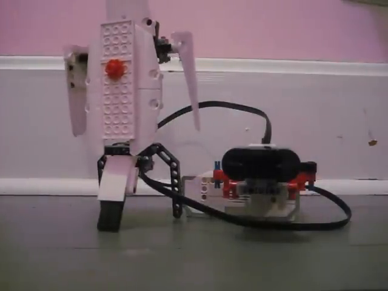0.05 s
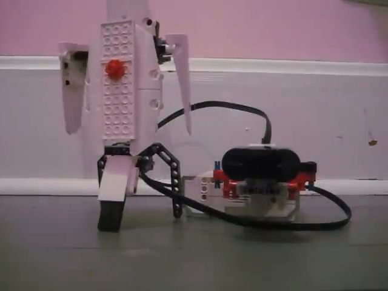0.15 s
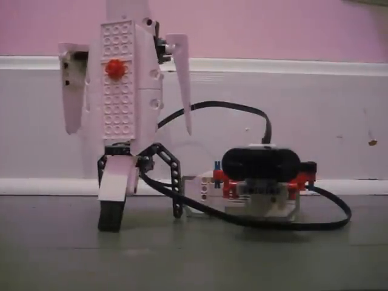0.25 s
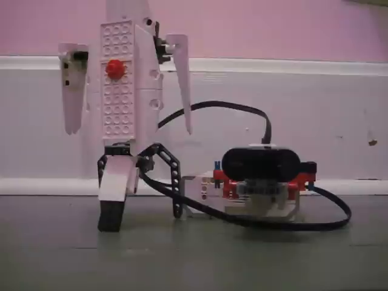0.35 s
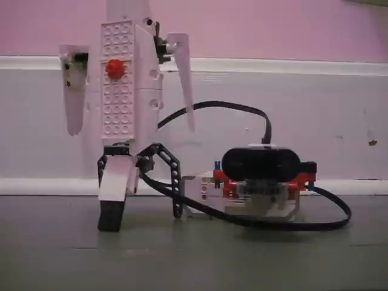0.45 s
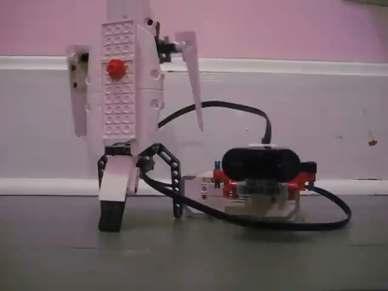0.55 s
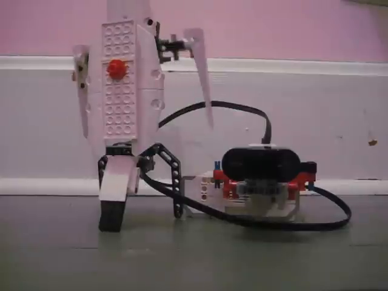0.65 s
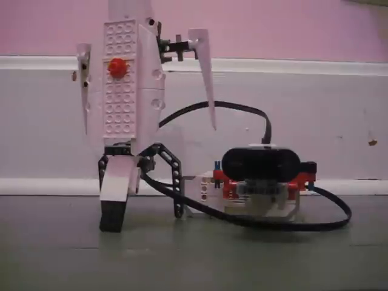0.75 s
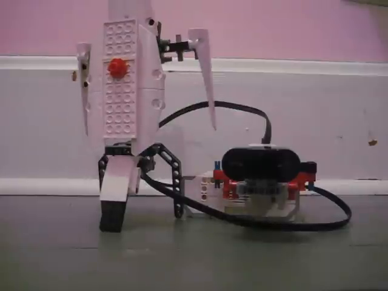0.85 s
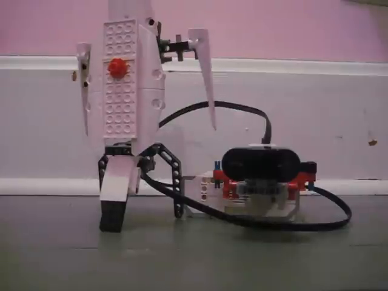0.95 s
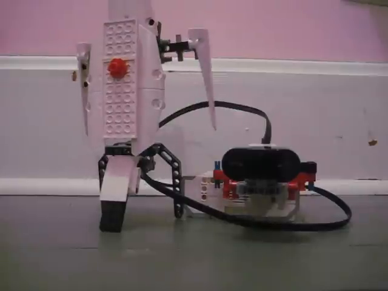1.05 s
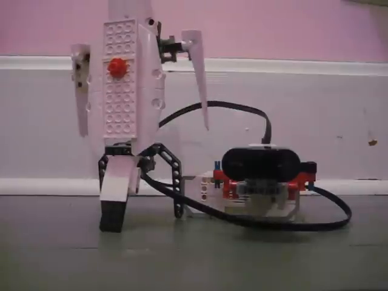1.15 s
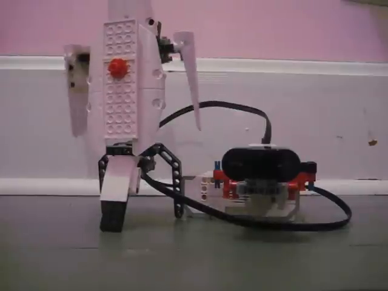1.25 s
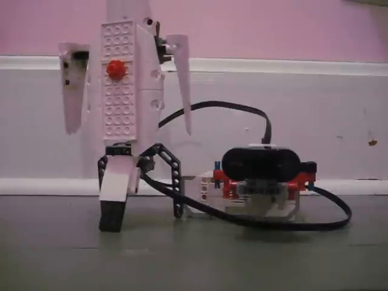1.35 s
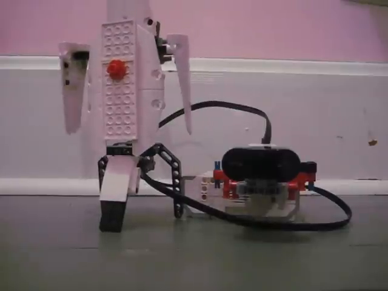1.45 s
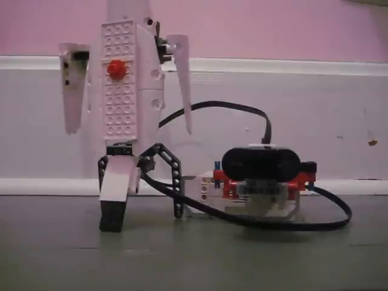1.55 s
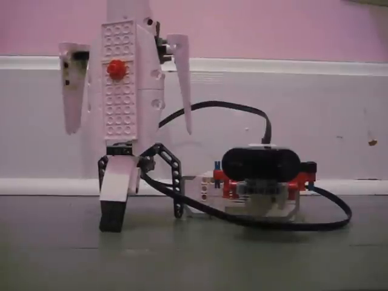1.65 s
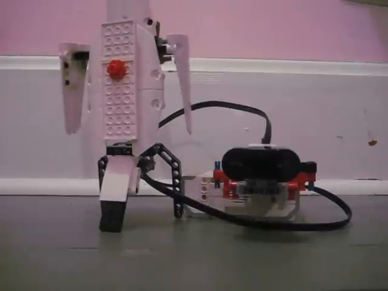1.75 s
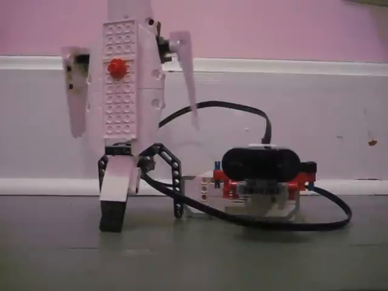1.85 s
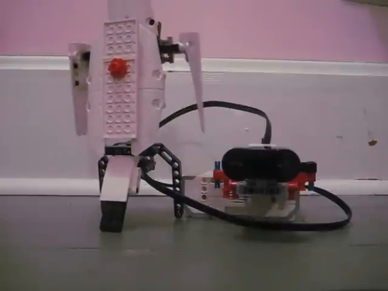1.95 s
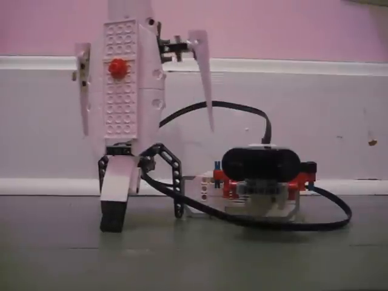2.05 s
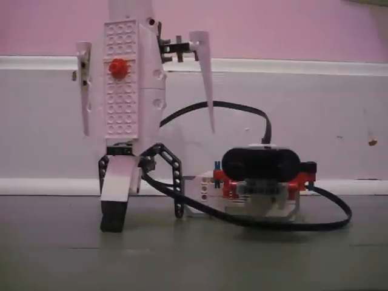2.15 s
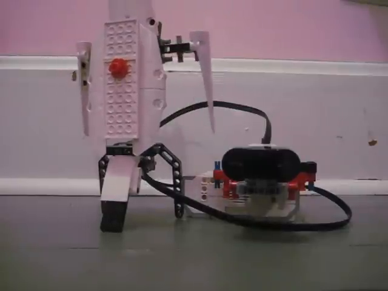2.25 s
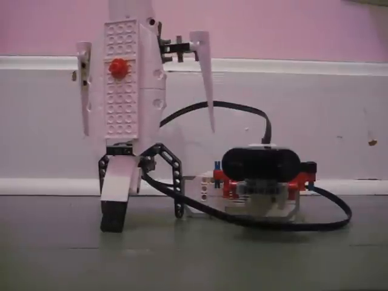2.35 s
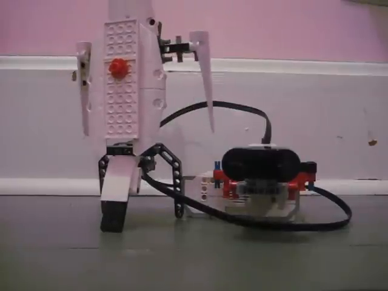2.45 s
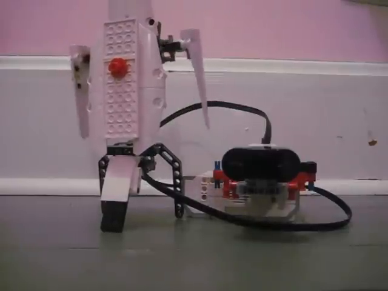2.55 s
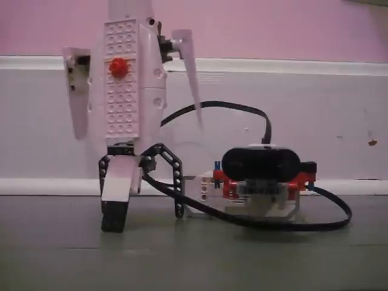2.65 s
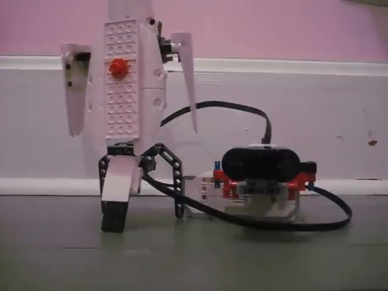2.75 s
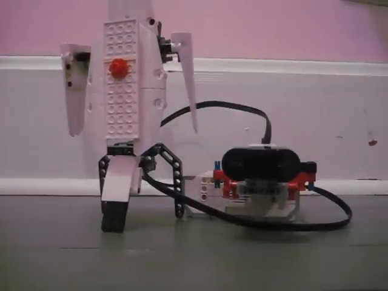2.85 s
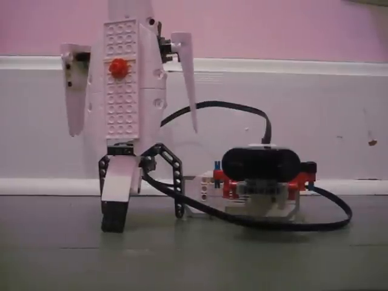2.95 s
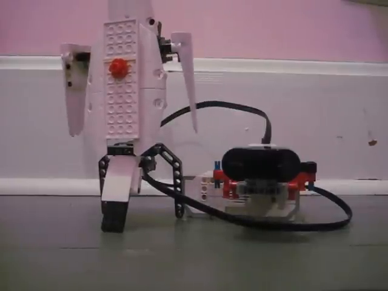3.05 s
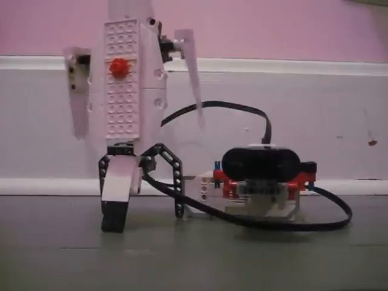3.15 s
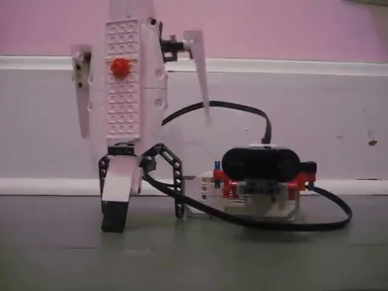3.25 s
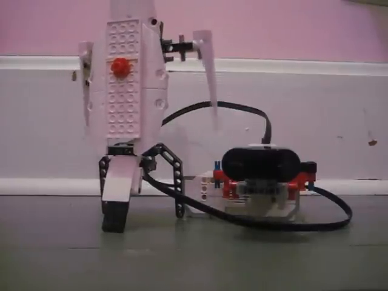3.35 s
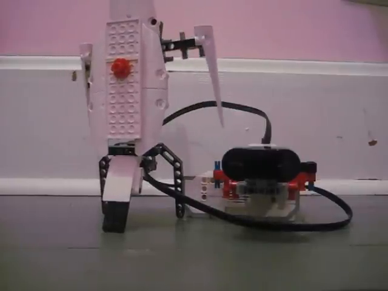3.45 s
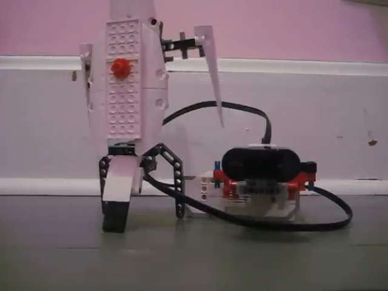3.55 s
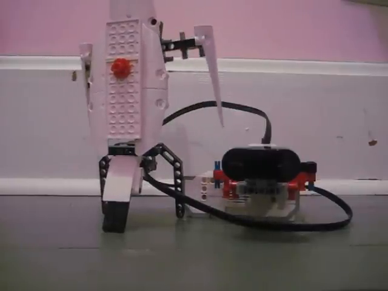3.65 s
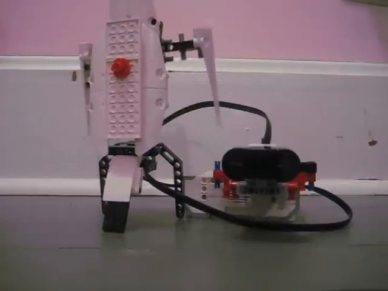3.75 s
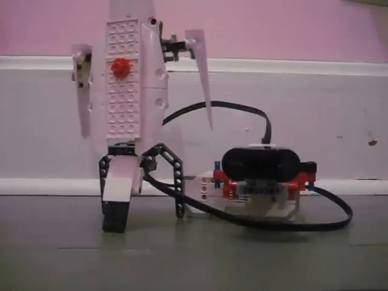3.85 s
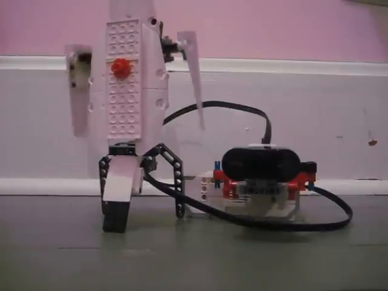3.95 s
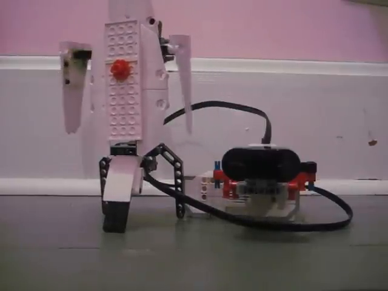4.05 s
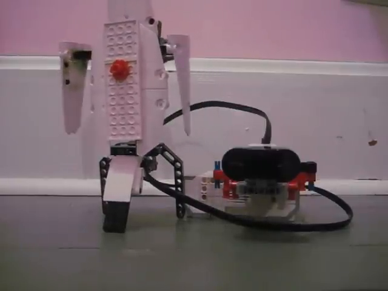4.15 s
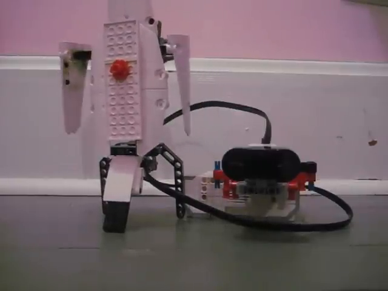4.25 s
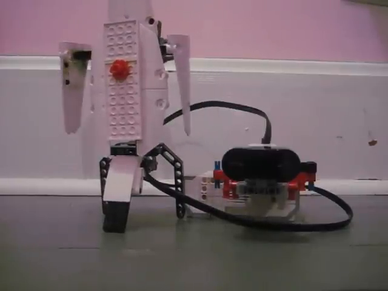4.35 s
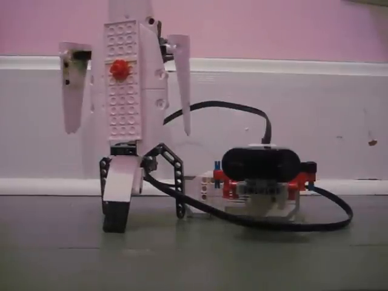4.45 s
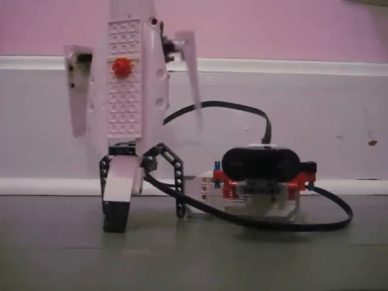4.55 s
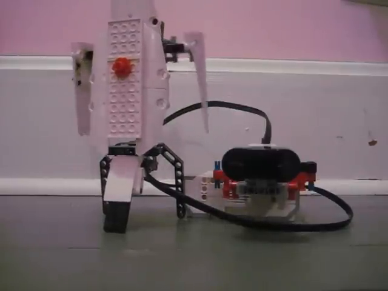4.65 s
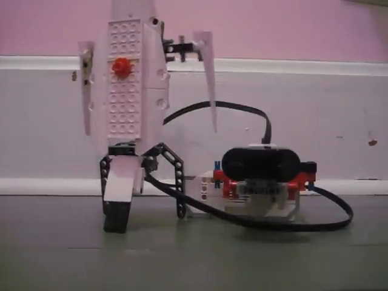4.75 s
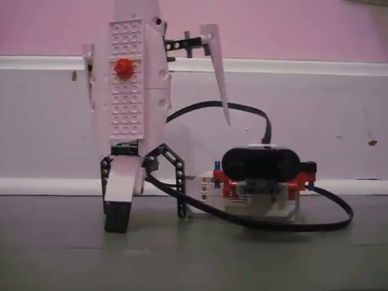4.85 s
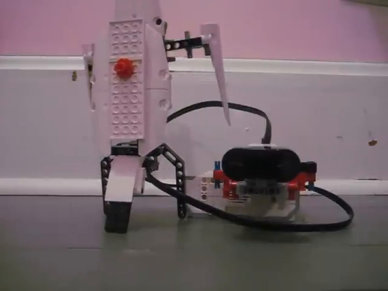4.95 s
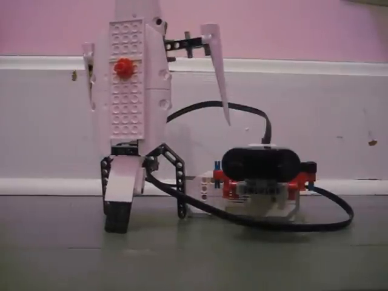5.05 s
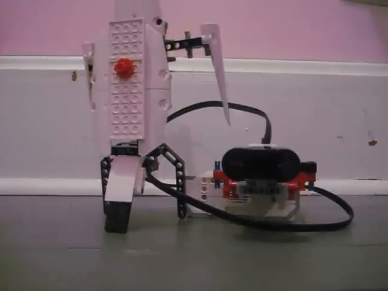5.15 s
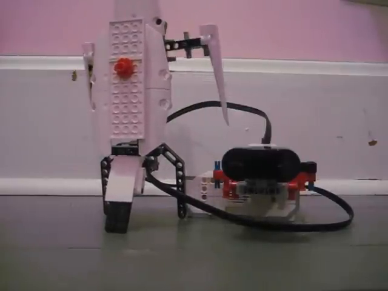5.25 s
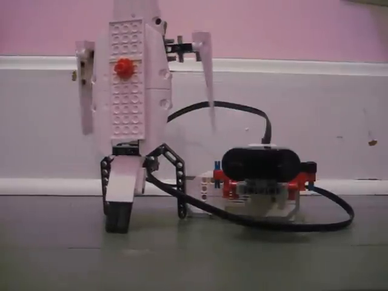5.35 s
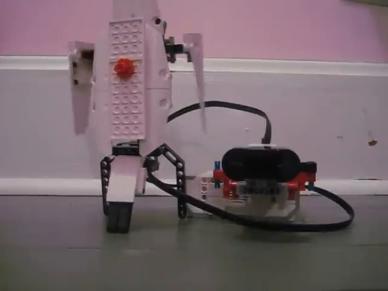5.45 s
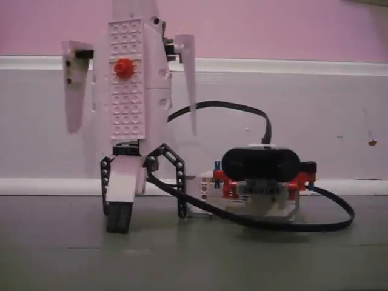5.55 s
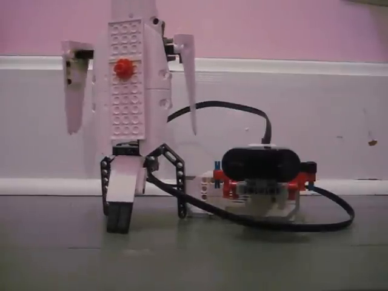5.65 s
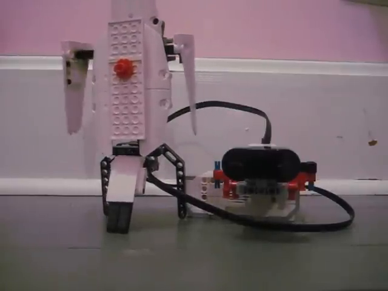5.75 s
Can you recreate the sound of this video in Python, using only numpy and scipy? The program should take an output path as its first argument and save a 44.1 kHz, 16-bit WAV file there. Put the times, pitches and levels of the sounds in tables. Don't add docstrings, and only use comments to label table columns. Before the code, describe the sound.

A small geared toy motor is heard close up on a hard floor in a bare room. It is already rasping at the start and stops at 0.14 s. Eight more bursts start at about 0.44, 1.06, 1.8, 2.45, 3.1, 3.75, 4.5 and 5.25 s, each lasting 0.25 to 0.35 s. Each spins up almost instantly into dense, bright plastic chatter, sagging briefly as the gears bind, then cuts off with a short room ring; bursts seven and eight coast down more slowly. Forward swings squeal higher, around 2 kHz, with a singing motor tone; back swings squeal lower, near 1.5 kHz. Feet thud softly and skid, notably at 3.4 and 5.6 s. A hard plastic knock lands at 1.34 s, with sharp ticks at 1.2, 2.55 and 4.7 s. Weaker knocks at 5.57 s lead to faint low creaks until 5.8 s. Hiss, rumble and thin electronic whistles continue throughout.

```python
import sys
import numpy as np
from scipy import signal
from scipy.fft import rfft, irfft
from scipy.io import wavfile
from scipy.ndimage import uniform_filter1d

SR = 44100
rng = np.random.default_rng(int(sys.argv[2]) if len(sys.argv) > 2 else 0)


def convert_level_to_amplitude(level_db):
    exponent = np.asarray(level_db, float) / 20
    return 10 ** exponent


def put_to_file(sound):
    columns = np.atleast_2d(sound).T
    safe = np.clip(columns, -1, 1)
    whole_steps = np.round(safe * 32767)
    wavfile.write(sys.argv[1], SR, whole_steps.astype(np.int16))


N = 255780
TIME = np.arange(N) / SR
BINS = np.maximum(np.fft.rfftfreq(N, 1 / SR), 1)


def rms_one(x):
    return x / np.sqrt(np.mean(x ** 2) + 1e-20)


def at_hz(points, hz):
    points_hz, values = np.array(points).T
    return np.interp(np.log(hz), np.log(points_hz), values)


def colour(x, gain):
    return irfft(rfft(x) * gain, N)


def low_pass(hz, order):
    return 1 / np.sqrt(1 + (BINS / hz) ** order)


def drift(rate_hz):
    return rms_one(colour(rng.standard_normal(N), 1 / (1 + (BINS / rate_hz) ** 2)))


def resonate(x, hz, width_hz):
    r = np.exp(-np.pi * width_hz / SR)
    zeros = [(1 - r * r) / 2, 0, (r * r - 1) / 2]
    poles = [1, -2 * r * np.cos(2 * np.pi * hz / SR), r * r]
    return signal.lfilter(zeros, poles, x + 1e-18)


def strikes(rows):
    out = np.zeros(N)
    for s, db in rows:
        out[round(s * SR)] = convert_level_to_amplitude(db)
    return out


def bell(centre_s, width_s):
    return np.exp(-.5 * ((TIME - centre_s) / width_s) ** 2)


def swells(rows):
    return sum(convert_level_to_amplitude(db) * bell(s, width_s) for s, db, width_s in rows)


def evened(x, seconds):
    return x / np.sqrt(uniform_filter1d(x ** 2, size=round(seconds * SR)) + 1e-20)


# start in seconds, stop in seconds, chatter level in dB,
# spin-up time in seconds, coasting rate in dB per second.
SWINGS = [
    (-0.06, 0.136, -20.5, 0.022, 520),
    (0.441, 0.706, -23, 0.011, 600),
    (1.056, 1.336, -20.5, 0.017, 478),
    (1.815, 2.077, -22, 0.015, 700),
    (2.442, 2.677, -20.5, 0.013, 520),
    (3.097, 3.389, -21.5, 0.022, 598),
    (3.733, 4.045, -20.5, 0.012, 314),
    (4.491, 4.831, -22, 0.011, 330),
    (5.238, 5.561, -20, 0.011, 420),
]


def running(column_db, coast_share=1, linger_s=0., spin_shares=(1, 1)):
    kick_db, kick_s, spin_up_db = 21, 0.0032, 20.5
    out = np.full(N, -200.)
    for k, ((start, stop, _, spin_s, coast), db) in enumerate(zip(SWINGS, column_db)):
        t = np.maximum(TIME - start, 0)
        kick = kick_db * np.exp(-t / kick_s)
        spin_up = spin_shares[k % 2] * spin_up_db * np.exp(-t / spin_s)
        backswing = k % 2 == 0
        fall = coast_share * coast * np.maximum(TIME - stop - linger_s * backswing, 0)
        out = np.where(TIME >= start, db - kick - spin_up - fall, out)
    return out


# time in seconds, depth in dB.
HITCHES = [(0.031, 3.5), (0.575, 2), (0.66, 2), (1.14, 2.5), (1.225, 0.5), (1.953, 3.5), (2.039, 4.5),
           (2.512, 4.5), (2.605, 0), (3.225, 2.5), (3.3, 3.5), (3.825, 1.5), (3.92, -2), (4.575, -0.5),
           (4.64, 3.5), (4.725, 3), (5.345, 0), (5.43, 0), (5.49, 0.5)]


def gear_levels():
    sag_s, free_s = 0.018, 0.007
    brake_db, brake_s = 1, 0.0098
    chatter = np.array(SWINGS)[:, 2]
    low = chatter + np.resize((-6.5, -4.5), len(SWINGS))
    edge = chatter + np.resize((-6.5, -4.5), len(SWINGS))
    sag = 0
    for s, depth_db in HITCHES:
        sag = sag + depth_db * np.exp(np.where(TIME < s, (TIME - s) / sag_s, (s - TIME) / free_s))
    flare = sum(brake_db * bell(stop - brake_s, brake_s) for _, stop, *_ in SWINGS[1::2])
    chatter_db = running(chatter)
    edge_db = running(edge, coast_share=1.6, spin_shares=(1.5, 1.5)) - chatter_db - 0.9 * sag + flare
    low_db = running(low, coast_share=0.83, linger_s=0.0071, spin_shares=(0.13, 1.2)) - sag
    return chatter_db - sag, low_db, edge_db


# frequency in Hz, level in dB per Hz.
HOUSING = [(410, -44), (700, -9.5), (1360, -5), (1540, -0.5), (2190, -6.5), (2460, -7), (2870, -5.5),
           (3110, -5), (3580, 1), (4470, -4.5), (5710, 3.5), (8880, -12), (9720, -15.5), (15500, -16)]
# frequency in Hz, width in Hz, level in dB.
SHELL = [(2250, 160, -1), (2886, 200, 7), (3557, 116, 0.5), (4870, 1200, 4.5), (7350, 190, -21)]


def gears(contacts_per_s, spread_db, lumpy_db, shell_db, panel_db):
    chatter_db, low_db, edge_db = gear_levels()
    sizes = convert_level_to_amplitude(spread_db * np.minimum(rng.exponential(1, N), 5)) * rng.choice([-1, 1], N)
    contacts = rms_one(sizes * (rng.random(N) < contacts_per_s / SR))
    panels_hz = np.geomspace(1000, 15000, 36) * rng.uniform(.98, 1.02, 36)
    panels = sum(convert_level_to_amplitude(panel_db + 4 * drift(35)) * resonate(contacts, hz, .035 * hz) for hz in panels_hz)
    shell = 0
    for hz, width_hz, db in SHELL:
        shell = shell + convert_level_to_amplitude(db + shell_db + 3 * drift(25)) * resonate(contacts, hz, width_hz)
    body = colour(contacts + panels, convert_level_to_amplitude(at_hz(HOUSING[:-1], BINS))) + shell
    above_low = 1 / np.sqrt(1 + (2500 / BINS) ** 8)
    above_middle = 1 / np.sqrt(1 + (8300 / BINS) ** 12)
    low = evened(colour(body, low_pass(2500, 8)), .05)
    middle = evened(colour(body, above_low * low_pass(8300, 12)), .05)
    edge = evened(colour(body, above_middle), .05)
    high = middle + convert_level_to_amplitude(edge_db) * edge
    return convert_level_to_amplitude(lumpy_db * drift(70)) * (convert_level_to_amplitude(chatter_db) * high + convert_level_to_amplitude(low_db - 0.5) * low)


# start in seconds, start in Hz, end in Hz, level in dB.
PINION = [(0.07, 2190, 2120, -32), (0.484, 2010, 2130, -20), (0.501, 2197, 2025, -12),
          (0.54, 1880, 1750, -20), (0.573, 2100, 2295, -20), (0.598, 2230, 2150, -21),
          (1.845, 2110, 2110, -22), (1.873, 2163, 2107, -12.5), (1.925, 1960, 1760, -20.5),
          (2.018, 2086, 1920, -25), (3.149, 2220, 1910, -15), (3.191, 1746, 1995, -18.5),
          (3.341, 2165, 2100, -16.5), (4.577, 2410, 1970, -15.5), (4.61, 1940, 1915, -15),
          (4.644, 2090, 2250, -19.5), (4.667, 2170, 2230, -23), (4.765, 2210, 2130, -16),
          (4.797, 2133, 2000, -23), (4.823, 2250, 2380, -20), (5.358, 2230, 2240, -20)]
# start in seconds, start in Hz, end in Hz, level in dB.
WHEEL = [(0.092, 1606, 1426, -20.5), (0.145, 1120, 1057, -29), (0.68, 1443, 1570, -22.5),
         (1.082, 1274, 1105, -27.5), (1.176, 1680, 1500, -25), (1.308, 1462, 1610, -22.5),
         (1.952, 1500, 1495, -23), (2.452, 1097, 1080, -28), (2.553, 1663, 1500, -19.5),
         (2.657, 1686, 1550, -34), (3.221, 1462, 1430, -26), (3.772, 1470, 1350, -24),
         (3.876, 1638, 1577, -23), (3.935, 1610, 1508, -40), (3.988, 1503, 1356, -27),
         (4.027, 1292, 1243, -23), (4.51, 1412, 1676, -23.5), (4.535, 1750, 1546, -19.5),
         (4.786, 1420, 1319, -20.5), (5.262, 1517, 1750, -28), (5.272, 740, 880, -27),
         (5.293, 1597, 1530, -21.5), (5.401, 1542, 1590, -21.5), (5.443, 1592, 1550, -40),
         (5.493, 1584, 1480, -25), (5.538, 1460, 1370, -24)]
# start in seconds, start in Hz, end in Hz, level in dB.
CREAKS = [
    (5.63, 449, 430, -39),
    (5.69, 430, 400, -49),
    (5.755, 420, 410, -44),
]


def whine(wobble):
    out = np.zeros(N)
    rough = 1 + wobble * drift(90)
    flutter = convert_level_to_amplitude(3 * drift(140))
    for squeals, length_s in (PINION, 0.0304), (WHEEL, 0.044), (CREAKS, 0.044):
        count = round(length_s * SR)
        for s, start_hz, end_hz, db in squeals:
            first = round(s * SR)
            span = slice(first, first + count)
            glide_hz = np.linspace(start_hz, end_hz, count) * rough[span]
            phase = 2 * np.pi * np.cumsum(glide_hz) / SR
            out[span] += convert_level_to_amplitude(db - 4.5) * np.sqrt(np.hanning(count)) * np.sin(phase)
    return out * flutter


# time in seconds, level in dB, width in seconds.
DRIVE = [(0.11, -42, 0.03), (0.51, -32.5, 0.03), (0.62, -36, 0.045), (1.273, -35, 0.04), (1.89, -30, 0.025),
         (2.03, -35, 0.046), (2.638, -38, 0.048), (3.17, -32, 0.035), (3.35, -32.5, 0.038),
         (3.993, -40, 0.05), (4.68, -28, 0.027), (4.79, -30.5, 0.03), (5.45, -46, 0.08)]
# multiple of the fundamental, level in dB.
DRIVE_ORDERS = [(2, -4.0), (3, -3.0), (4, -0.5), (5, -3.0), (7, -3.0), (8, -4.0)]
# frequency in Hz, swing by swing.
FOURTH_HZ = [2966, 2887, 2806, 2890, 2870, 2920, 2874, 2910, 2870]


def drive(wobble):
    swing = np.searchsorted(np.array(SWINGS)[1:, 0], TIME)
    level = convert_level_to_amplitude(running([0] * len(SWINGS))) * swells(DRIVE)
    fundamental_hz = np.array(FOURTH_HZ)[swing] / 4 * (1 + wobble * drift(45.2))
    phase = 2 * np.pi * np.cumsum(fundamental_hz) / SR
    return level * sum(convert_level_to_amplitude(db + 4 * drift(25)) * np.sin(round(k) * phase) for k, db in DRIVE_ORDERS)


# time in seconds, peak in dB.
KNOCKS = [
    (1.339, -26.5),
    (1.438, -52),
    (4.938, -58),
    (5.570, -36),
    (5.580, -42),
]
# frequency in Hz, level in dB, time to fall 60 dB in seconds.
ARM = [(1103, 13.5, 0.032), (1208, 3, 0.097), (1175, -24, 0.7), (1295, -10, 0.43), (1250, -38, 0.22),
       (1160, -16, .3)]
# time in seconds, peak in dB.
TICKS = [
    (1.1924, -4),
    (2.553, 3),
    (4.679, -2),
    (4.8044, -13),
    (4.9472, -15),
    (5.328, -5),
    (5.393, -2),
]


def arm():
    push = np.hanning(420) * np.sin(2 * np.pi * 1180 * TIME[:420]) / 60
    blow = signal.fftconvolve(strikes(KNOCKS), push)[:N]
    width = np.log(1000) / np.pi
    rings = 0
    for hz, db, t60 in ARM:
        level = convert_level_to_amplitude(db) * SR * t60 / (width * np.pi)
        rings = rings + level * resonate(blow, hz, width / t60)
    snap = convert_level_to_amplitude(8) * resonate(resonate(strikes(TICKS), 5600, 4000), 5600, 4000)
    return rings + snap


# time in seconds, level in dB, width in seconds.
ROCKS = [(0.09, -51, 0.03), (0.17, -39.5, 0.024), (0.545, -38, 0.033), (0.65, -55, 0.018),
         (0.73, -42.5, 0.037), (1.12, -44, 0.016), (1.21, -41, 0.025), (1.26, -48, 0.025),
         (1.325, -35, 0.004), (1.375, -40, 0.012), (1.46, -51.5, 0.026), (1.912, -39.5, 0.018),
         (2.02, -49.5, 0.032), (2.58, -43, 0.05), (2.71, -46, 0.029), (3.16, -51, 0.025),
         (3.3, -43.5, 0.04), (3.42, -41, 0.027), (3.81, -48.5, 0.035), (3.945, -39, 0.03),
         (4.07, -37.5, 0.037), (4.59, -40.5, 0.042), (4.73, -40, 0.021), (4.85, -36, 0.032),
         (5.37, -47, 0.04), (5.465, -37.5, 0.024), (5.58, -36, 0.027)]
# time in seconds, peak in dB.
THUDS = [(0.141, -33.5), (0.527, -32), (0.616, -30), (0.65, -39), (1.064, -42), (1.202, -38), (1.319, -55),
         (1.337, -23), (1.39, -38), (1.883, -33.5), (1.91, -38), (1.992, -30), (2.576, -41), (2.677, -40),
         (3.259, -32.5), (3.376, -30), (3.93, -37), (3.999, -35), (4.028, -31), (4.05, -31.5), (4.516, -46),
         (4.576, -38), (4.599, -33), (4.683, -29), (4.794, -32), (4.828, -31), (5.437, -39.5), (5.535, -52),
         (5.561, -30)]
# time in seconds, level in dB.
SKIDS = [
    (0.17, -44),
    (1.345, -36.5),
    (2.005, -46),
    (2.447, -51),
    (2.58, -47),
    (3.262, -43),
    (3.382, -33),
    (4.055, -40),
    (4.835, -37.5),
    (5.575, -33),
]
# mode frequency in Hz, first the rocking mode, then the thudding one.
FRAME_MODES_HZ = [179, 311.6]


def frame():
    rock_hz, thud_hz = FRAME_MODES_HZ
    scuff_s = 0.011
    thud_scuffs = [(s, db - 17.5, scuff_s) for s, db in THUDS]
    skid_scuffs = [(s, db, scuff_s) for s, db in SKIDS]
    shuffling = convert_level_to_amplitude(running([-43.5] * len(SWINGS), coast_share=0.16)) + swells(thud_scuffs + skid_scuffs)
    low = np.sin(2 * np.pi * np.cumsum(rock_hz * (1 + 0.0428 * drift(40))) / SR)
    tilt = convert_level_to_amplitude(at_hz([(200, 6.7), (300, 7.2), (900, 7.2)], BINS))
    band = low_pass(950, 12) / np.sqrt(1 + (210 / BINS) ** 12)
    shuffle = rms_one(colour(rng.standard_normal(N), tilt * band))
    thuds = resonate(resonate(strikes(THUDS), thud_hz, 130), thud_hz, 20.5)
    return convert_level_to_amplitude(3.0) * swells(ROCKS) * low + shuffling * shuffle + convert_level_to_amplitude(55.5) * thuds


# frequency in Hz, time to fall 60 dB in seconds.
ROOM_T60 = [(150, 0.24), (1000, 0.28), (3000, 0.43), (7000, 0.36), (15000, 0.3)]


def room(x):
    edges = 100 * 2 ** np.arange(0, 7.6, .5)
    t = TIME[:SR]
    tail = 0
    for low, high in zip(edges, edges[1:]):
        sos = signal.butter(2, [low, high], "band", fs=SR, output="sos")
        band = signal.sosfilt(sos, rng.standard_normal(SR))
        tail = tail + band * convert_level_to_amplitude(-60 * t / at_hz(ROOM_T60, np.sqrt(low * high)))
    tail *= np.clip((t - .004) / 0.008, 0, 1)
    return signal.fftconvolve(x, tail / np.sqrt(np.sum(tail ** 2)))[:N]


# frequency in Hz, level in dB per Hz.
HISS = [(15, -34.5), (25, -5.5), (122, -1), (240, -3.5), (390, -0.5), (616, -5), (1080, -2), (3740, -9.5),
        (4900, -7), (6770, -13), (7340, -11.5), (9870, -15.5), (15600, -19)]
# frequency in Hz, width in Hz, level in dB.
HISS_BUMPS = [(4800, 500, -17), (11100, 500, -19), (13150, 450, -19), (15150, 350, -18)]
# frequency in Hz, rms level in dB.
WHISTLES = [(118.4, -64.5), (1061, -63), (7558, -62), (7590, -79), (11106, -88), (15149, -78)]


def background():
    white = rng.standard_normal(N)
    humps = sum(convert_level_to_amplitude(db) * resonate(white[::-1], hz, width_hz) for hz, width_hz, db in HISS_BUMPS)
    noise = rms_one(colour(white, convert_level_to_amplitude(at_hz(HISS[:-1], BINS))) + humps)
    hiss = convert_level_to_amplitude(-47 + .5 * drift(8)) * noise
    whistles = sum(np.sqrt(2) * convert_level_to_amplitude(db) * np.sin(2 * np.pi * hz * TIME) for hz, db in WHISTLES)
    return hiss + whistles


def scene():
    rattle = gears(contacts_per_s=9000, spread_db=2.2, lumpy_db=1.1, shell_db=-7.0, panel_db=2.0)
    toy = convert_level_to_amplitude(-1.78) * rattle + arm()
    tones = whine(wobble=0.026) + drive(wobble=0.015)
    reflections = convert_level_to_amplitude(-14) * room(toy + tones / 2)
    return (toy + tones + reflections + frame() + background())[None]


def band_limit(x):
    return signal.sosfilt(signal.butter(12, 17020, fs=SR, output="sos"), x)


def record(dry):
    rounded = .9 * np.tanh(dry / .9)
    mix = colour(rounded, 1 / (1 + (BINS / 15810) ** 400))
    return band_limit(mix)


dry = scene()
out = record(dry)
put_to_file(out)
```